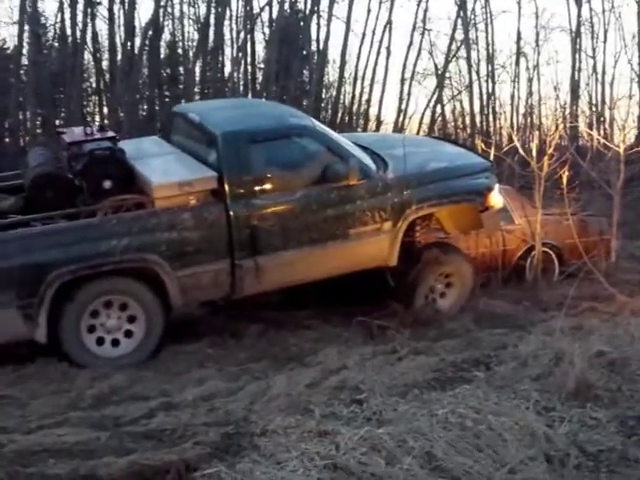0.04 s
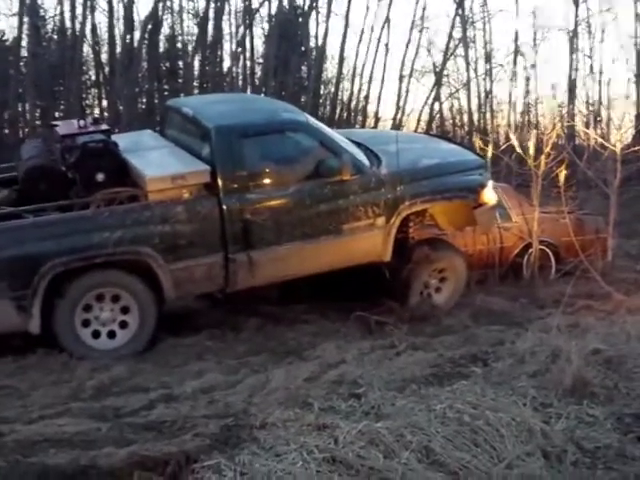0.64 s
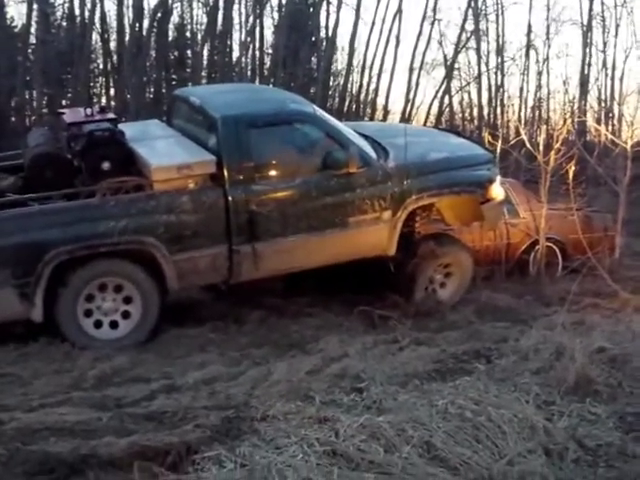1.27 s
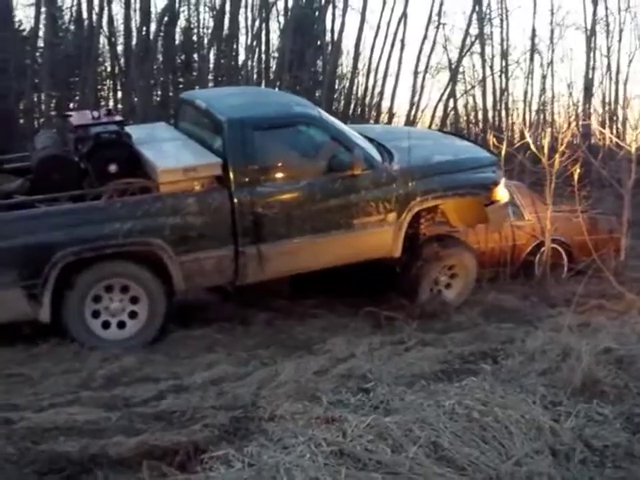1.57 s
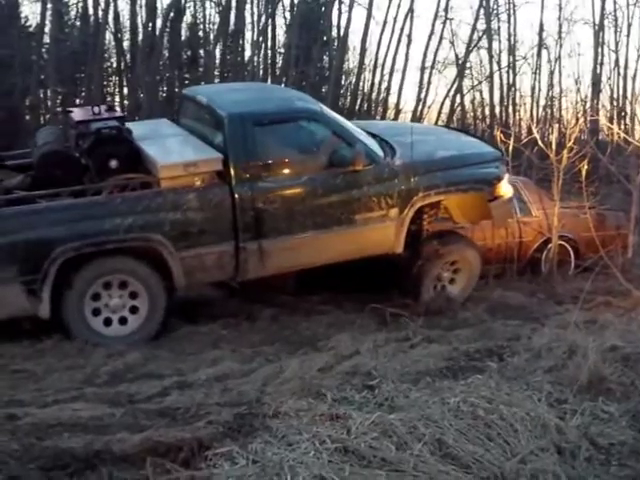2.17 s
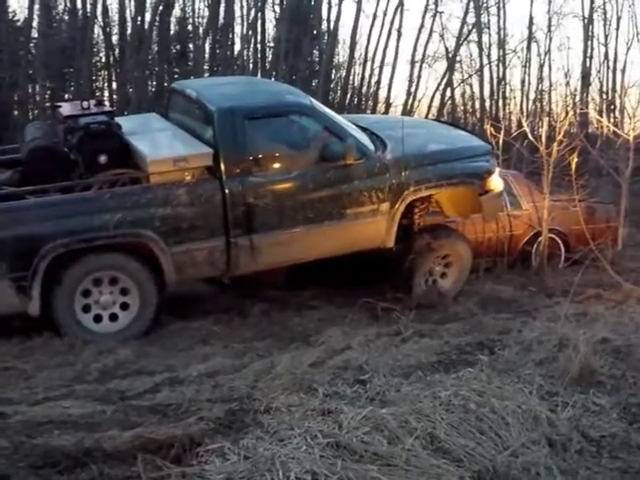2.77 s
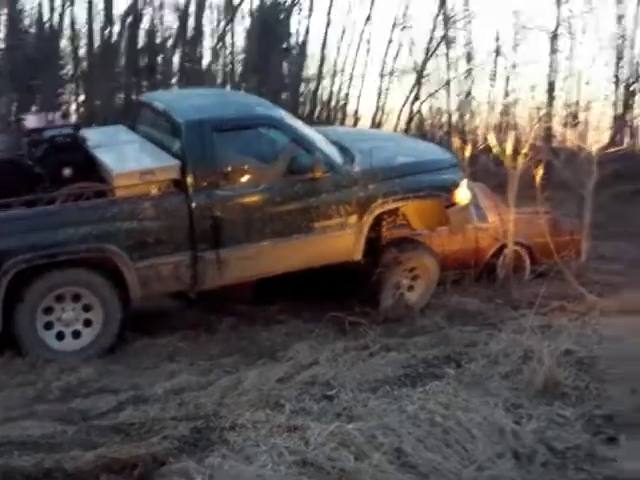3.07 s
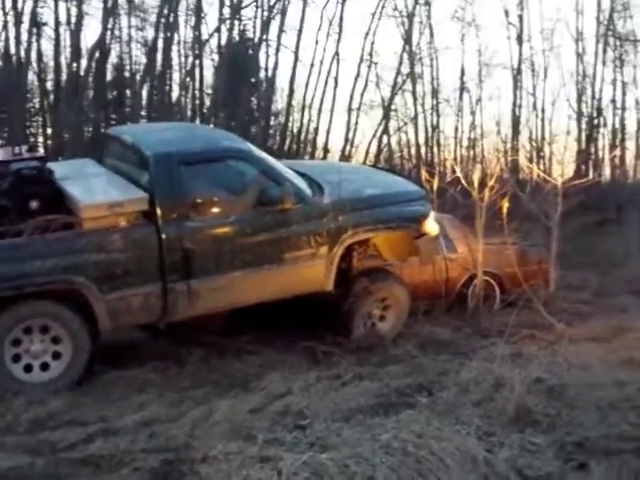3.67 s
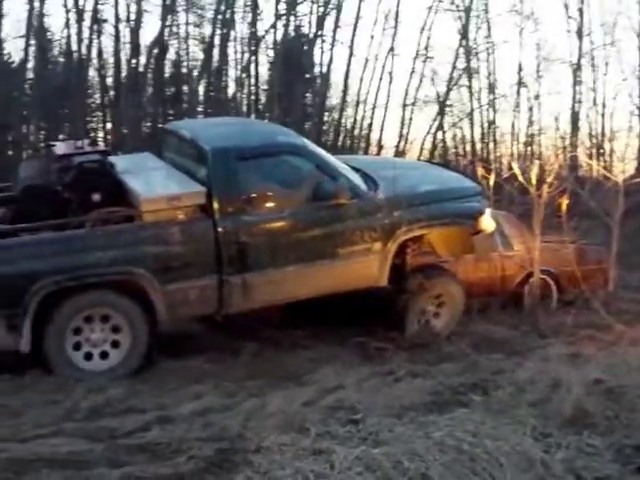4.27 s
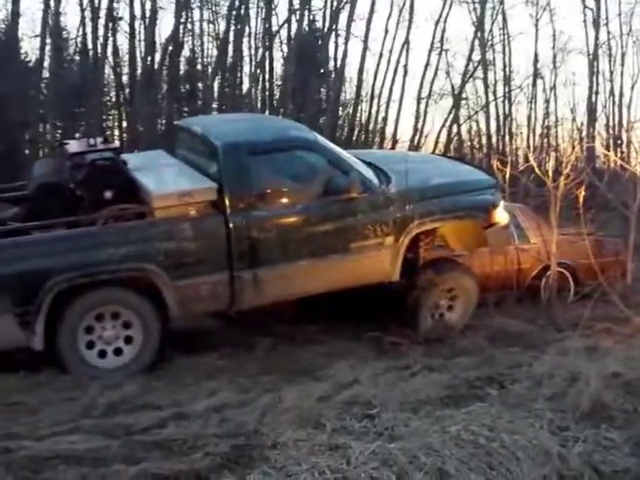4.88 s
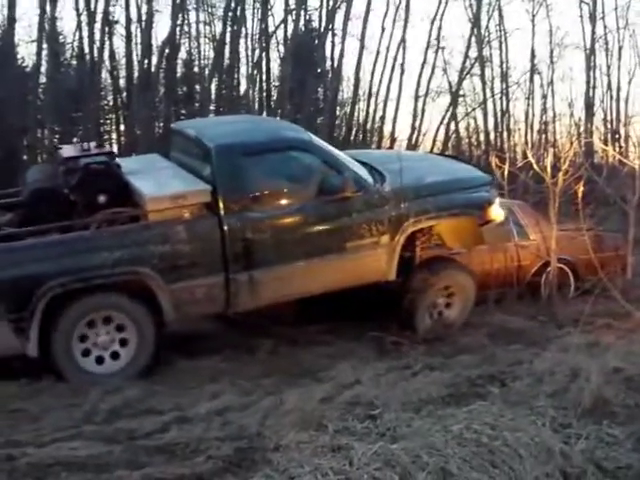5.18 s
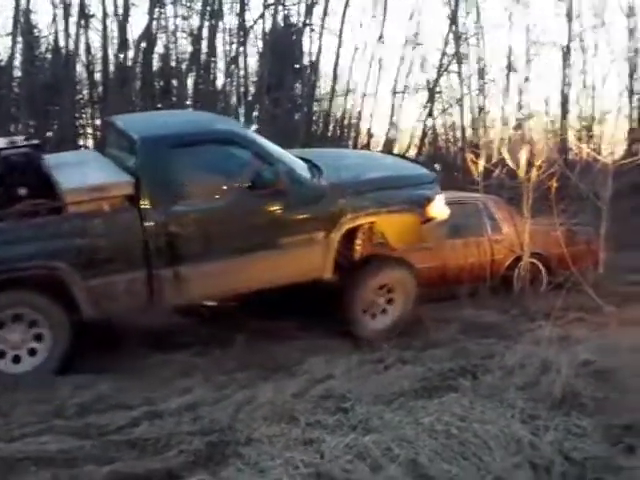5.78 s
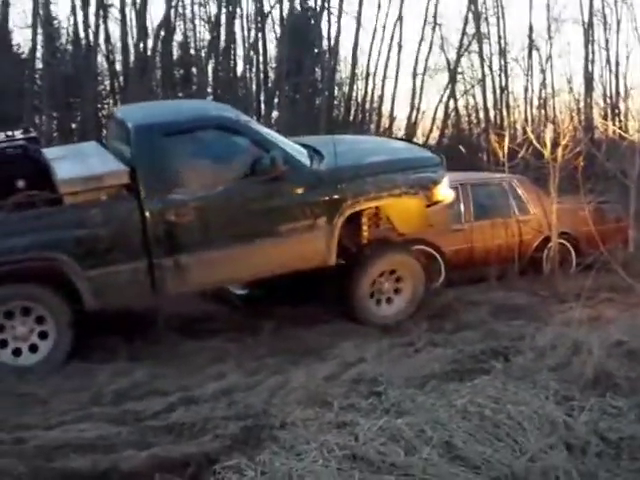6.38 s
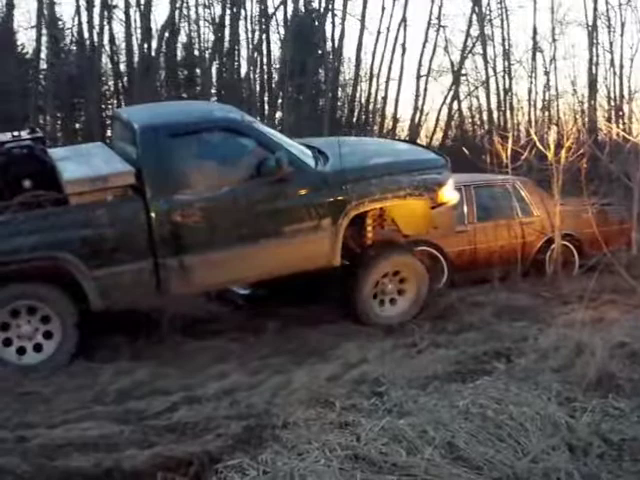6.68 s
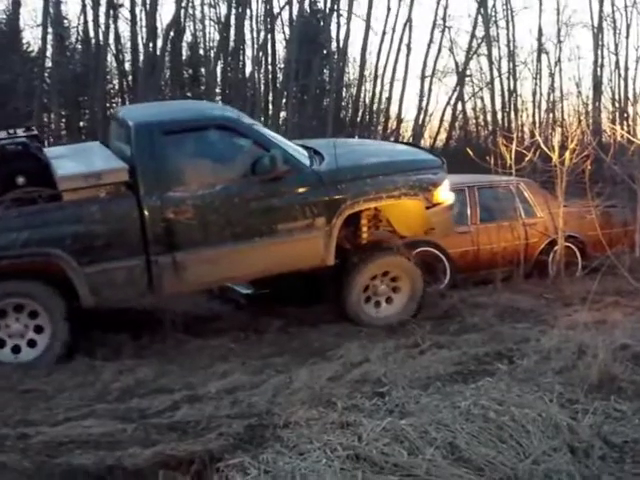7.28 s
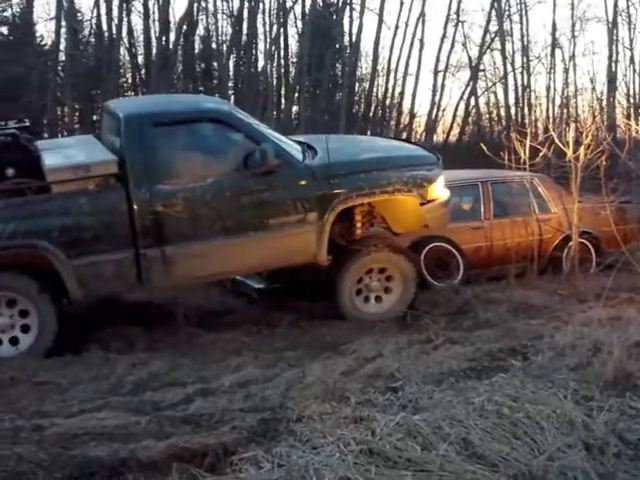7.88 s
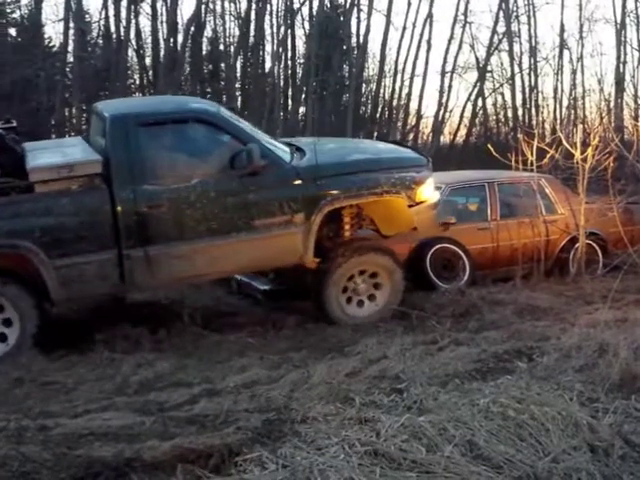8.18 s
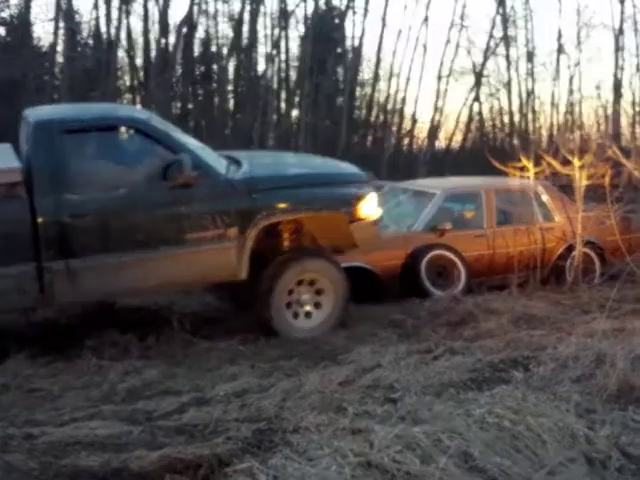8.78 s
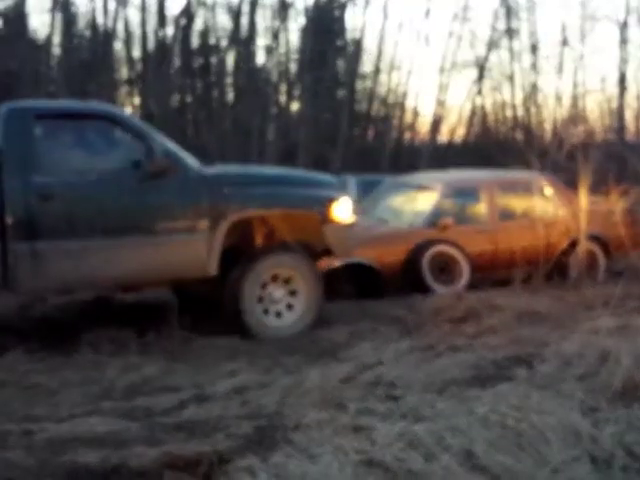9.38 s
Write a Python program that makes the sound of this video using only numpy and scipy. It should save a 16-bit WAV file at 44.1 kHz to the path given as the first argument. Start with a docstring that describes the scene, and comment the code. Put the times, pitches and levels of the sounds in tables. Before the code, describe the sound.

Heard from beside the vehicle outdoors, a heavy pickup engine rumbles and climbs through three revs, each bringing a raspy, clacking exhaust leak over rushing fan air and faint crackling grass. The engine eases as the truck rolls forward, with a short branch scrape, snapping twigs and two dull body knocks. It revs twice more in quick succession, then drops to a lumpy idle while the body knocks again and more twigs crack.

```python
"""A V8 pickup idles in a field and is revved five times, sinking back in between. From the start its fan
rushes, the exhaust booms in the tailpipe, and gas ticks hard under load, as from a leaking manifold (the
pipes on the engine). Dry grass crackles under the tyres. After the third rev, at 5.6 s, the truck rolls
forward over brush: a branch scrapes, twigs snap and the body knocks twice. Two more revs follow, and
as the engine falls back to idle the body knocks again and more twigs snap."""
import sys
import numpy as np
from scipy import signal
from scipy.fft import rfft, irfft, next_fast_len
from scipy.io import wavfile
from scipy.ndimage import uniform_filter1d

SR = 44100
rng = np.random.default_rng(int(sys.argv[2]) if len(sys.argv) > 2 else 0)


def wav_out(sig):
    """Save sig, one row per channel (or a flat mono array), as 16-bit PCM at SR to the path in sys.argv[1]."""
    wavfile.write(sys.argv[1], SR, np.round(np.clip(np.atleast_2d(sig).T, -1, 1) * 32767).astype(np.int16))


N = 420713
TIME = np.arange(N) / SR
UNEVEN_DB = 1.1  # basic spread in strength from one firing to the next

# engine speed: t/s, firings per second
ENGINE_SPEED = [(0.0, 50.87), (0.24, 49.65), (0.33, 63.74), (0.42, 75.26), (0.52, 92.58), (0.61, 103.67),
                (0.72, 105.84), (0.81, 105.87), (1.03, 96.4), (1.18, 99.09), (1.31, 98.66), (1.55, 76.57),
                (1.98, 50.16), (2.4, 48.9), (2.5, 56.28), (2.6, 67.61), (2.79, 82.59), (3.13, 83.24),
                (3.3, 105.91), (3.4, 121.02), (3.51, 136.96), (3.71, 128.75), (3.9, 114.62), (4.15, 94.68),
                (4.58, 60.14), (4.75, 52.01), (4.84, 47.46), (4.92, 60.92), (4.99, 72.49), (5.1, 85.2),
                (5.2, 97.79), (5.27, 111.62), (5.35, 123.11), (5.43, 128.5), (5.54, 111.55), (5.7, 89.96),
                (6.05, 69.36), (6.64, 53.28), (6.72, 65.97), (6.82, 62.88), (6.89, 68.83), (6.97, 88.73),
                (7.07, 97.21), (7.15, 94.17), (7.28, 88.51), (7.4, 82.12), (7.52, 77.33), (7.8, 94.9),
                (7.92, 99.87), (8.05, 96.81), (8.25, 91.96), (8.38, 81.49), (8.54, 69.3), (8.75, 65.86),
                (9.2, 57.6), (9.54, 51.3)]
# the eight cylinders in firing order: exhaust level/dB, delay along the pipe/ms, leak level/dB
CYLINDERS = [(8.5, 0.056, 14), (1.5, 2.36, 11), (4.5, 2.36, 15), (7, 0.4, 10), (-4, 1.76, 15),
             (6.5, 0.13, 17), (5, 0.82, 14.5), (0.5, 2.37, 11.5)]
# rise and fall of the highest sounds: t/s, level/dB
TREBLE_LEVEL = [(0.04, -65), (0.43, -58.5), (1.3, -81), (2.58, -58), (2.92, -67.5), (3.42, -54), (3.6, -81),
                (4.34, -79.5), (5.05, -60), (5.28, -54.5), (5.41, -57), (5.55, -71.5), (6.46, -83),
                (6.86, -50), (7.2, -59.5), (8.29, -54.5), (8.4, -83), (9.45, -60)]


def from_db(db):
    """Turn decibels into a gain."""
    return 10 ** (np.asarray(db) / 20)


def in_time(rows):
    """Read each column of a time table at every sample."""
    times, *columns = np.transpose(rows)
    return [np.interp(TIME, times, column) for column in columns]


def at_hz(points):
    """Read a frequency table in fine, even steps."""
    hz, value = np.transpose(points)
    size = next_fast_len(N // 2 + SR // 4)
    return np.interp(np.log(np.linspace(0, SR / 2, size + 1) + 1), np.log(hz), value)


def filtered(x, gains):
    """Give each frequency its own gain."""
    return irfft(rfft(x, 2 * len(gains) - 2) * gains)[..., :N]


def coloured(x, colour):
    """Shape the tone with a table so that nothing sounds early (a minimum-phase filter)."""
    db = at_hz(colour)
    cepstrum = irfft(np.log(from_db(db)))
    cepstrum[1:len(db) - 1] *= 2
    cepstrum[len(db):] = 0
    return filtered(x, np.exp(rfft(cepstrum)))


def passed(x, hz, kind):
    """Let only the lows, the highs or a band through."""
    return signal.sosfilt(signal.butter(4, hz, kind, fs=SR, output="sos"), x)


def resonance(x, hz, width_hz):
    """Ring at one pitch; the narrower the width, the longer the ring."""
    r = np.exp(-np.pi * width_hz / SR)
    feedback = [1, -2 * r * np.cos(2 * np.pi * hz / SR), r * r]
    return signal.lfilter(np.array([1, 0, -1]) * (1 - r * r) / 2, feedback, x)


def evened(x, low_hz, high_hz, size=5000):
    """Scale a stereo sound so that one band stays at level 1, averaged over `size` samples."""
    power = passed(x.mean(0), [low_hz, high_hz], "band") ** 2
    return x / np.sqrt(uniform_filter1d(uniform_filter1d(power, size), size // 2) + 1e-14)


def clicks(times, heights):
    """Place a one-sample click at each time."""
    return np.bincount(np.clip(np.asarray(times) * SR, 0, N - 1).astype(int), heights, N) + 1e-18


def dying(x, decay_s):
    """Give each click a fading tail."""
    return signal.lfilter([1], [1, -np.exp(-1 / (decay_s * SR))], x)


def wavering(per_s, spread_db):
    """A gain that wanders at random."""
    times = np.arange(0, N / SR + 1, 1 / per_s)
    return from_db(spread_db * np.interp(TIME, times, rng.standard_normal(len(times))))


def panned(pair):
    """The left side is louder in the low treble and almost silent at the very top."""
    # balance of the sides: f/Hz, left minus right/dB
    balance = [(60, 1.5), (250, 2), (700, 2.5), (1250, 7), (2300, 15), (3300, 4.5), (5000, 7), (7200, -2.5),
               (8300, -27), (14000, -36)]
    tilt_db = at_hz(balance)
    common_db = -10 * np.log10((from_db(tilt_db) + from_db(-tilt_db)) / 2)
    return np.array([filtered(pair[0], from_db(common_db + tilt_db / 2)),
                     filtered(pair[1], from_db(common_db - tilt_db / 2))])


def from_truck(x, lag_ms):
    """Direct sound reaches the left side a little late."""
    return np.array([np.interp(TIME - lag_ms / 1000, TIME, x), x])


def stereo_noise():
    """Noise whose two sides are most alike in the low notes."""
    # how alike the sides are: f/Hz, likeness (1 the same, -1 or less opposite)
    likeness = [(100, 0.67), (300, 0.54), (630, 0.81), (1000, 0.088), (1400, -0.35), (3000, -0.21),
                (6500, 0.36), (14000, -2)]
    alike = np.clip(at_hz(likeness), -.99, .999)
    mid, side = rng.standard_normal((2, N))
    return (filtered(mid, np.sqrt(1 + alike)) + filtered(side, np.sqrt(1 - alike)) * [[1], [-1]]) / 2**.5


def engine_load(rise_s=0.22, fall_s=0.35):
    """How hard the engine works, 0-1: it builds as the pedal is pressed and drains as the foot lifts."""
    # presses of the accelerator: pressed t/s, lifted t/s, depth 0-1
    presses = [(-0.16, 0.074, 0.26), (0.123, 0.57, 0.53), (0.867, 1.012, 0.34), (2.14, 2.623, 0.48),
               (3.02, 3.418, 0.62), (4.643, 5.401, 0.76), (6.604, 7.184, 0.72), (7.04, 7.6, 0.5),
               (7.415, 8.217, 0.83), (9.09, 9.6, 0.01)]
    return np.max([depth * np.clip(np.minimum((TIME - down) / rise_s, 1 - (TIME - up) / fall_s), 0, 1)
                   for down, up, depth in presses], axis=0)


def engine_db(base_db, load_db, doubling_db):
    """A level that follows the load, each doubling of engine speed and a slow swell."""
    # slow swell: t/s, level/dB
    swell = [(0.0, -1), (1.36, -2.5), (1.83, -3.5), (3.02, -0.1), (3.62, -5.5), (4.28, -10.5), (4.69, -5.5),
             (5.56, -4.5), (5.65, -12), (6.37, -16), (6.82, -6), (8.49, -12), (8.88, -17), (9.54, 0)]
    doublings = np.log2(in_time(ENGINE_SPEED)[0] / 90)
    return base_db + load_db * engine_load() + doubling_db * doublings + in_time(swell)[0]


def rolled(start_s=5.6, length_s=0.17):
    """How far the truck has rolled, 0-1, until its front wheel is beside the listener."""
    return np.clip((TIME - start_s) / length_s, 0, 1)


def firing_count(start=7.42):
    """A running count of firings as the engine turns."""
    return start + np.cumsum(in_time(ENGINE_SPEED)[0]) / SR


def firings():
    """The time of every firing and the table row of its cylinder."""
    count = firing_count()
    numbers = np.arange(np.ceil(count[0]), count[-1]).astype(int)
    return np.interp(numbers, count, TIME), np.array(CYLINDERS)[numbers % len(CYLINDERS)]


def grass(stalks_per_s=400, spread_db=4.5, hiss=0.05, crack_s=0.011):
    """Dry stalks crackle under the tyres: many faint cracks and a few loud ones."""
    # tone of dry grass: f/Hz, level/dB
    colour = [(2500, -9), (5000, 12.5), (8000, 6.5), (12000, -2), (15000, -26)]
    breaks = rng.random(N) < stalks_per_s / SR
    cracks = breaks * from_db(spread_db * np.minimum(rng.exponential(1, N), 4))
    rustle = (hiss + dying(cracks + 1e-18, crack_s)) * rng.standard_normal((2, N))
    level_db = in_time(TREBLE_LEVEL)[0] + 8 - 12 * engine_load()
    return from_db(level_db) * evened(panned(coloured(rustle, colour)), 7450, 22000, size=14000)


def twigs(crack_s=0.0025, splinter_s=0.036):
    """A sharp crack rings the wood, then it splinters briefly."""
    # snapping twigs: t/s, relative level/dB
    snaps = [(5.824, -48), (5.877, -37), (5.937, -39), (6.224, -45), (8.43, -38.5), (8.514, -34.5),
             (8.622, -35.5), (8.811, -38), (8.968, -43), (9.113, -39), (9.197, -49), (9.257, -43),
             (9.368, -26), (9.498, -25)]
    # ringing notes of dry wood: f/Hz, width/Hz, level/dB
    wood = [(820, 66, 6), (1360, 90, 8), (2150, 140, 12), (5500, 330, 3)]
    # tone of a snap: f/Hz, level/dB
    colour = [(290, -37), (500, -21), (575, -4), (826, 14.5), (2040, 10), (2290, 9), (3380, 3.5), (6320, 2),
              (14000, -21)]
    times, snap_db = np.transpose(snaps)
    breaks = clicks(times, from_db(snap_db + 3))
    burst = (dying(breaks, crack_s) + 0.8 * dying(breaks, splinter_s)) * rng.laplace(0, 1, N)
    ring = sum(from_db(db) * resonance(burst, hz, width) for hz, width, db in wood)
    colour_gain = np.sqrt(np.mean(from_db(at_hz(colour)) ** 2))
    return panned(from_truck(coloured(burst + ring, colour), lag_ms=0.292)) / colour_gain / 2


def branch_scrape(start_s=5.8, end_s=5.97, from_hz=450, to_hz=927, slips_per_s=260):
    """A branch slips along the underside and rings; its pitch rises as it bends."""
    along = np.clip((TIME - start_s) / (end_s - start_s), 0, 1)
    slips = (rng.random(N) < slips_per_s / SR) * rng.standard_normal(N)
    ring = dying(slips + 1e-18, decay_s=0.0022)
    phase = 2 * np.pi * np.cumsum(from_hz + (to_hz - from_hz) * along) / SR
    sound = ring / ring.std() * (np.sin(phase) + from_db(-3) * np.sin(3 * phase))
    return panned(from_truck(from_db(-34) * np.sin(np.pi * along) * sound, lag_ms=0.092))


def body_knocks(level_db=-5):
    """Bumps set the truck's body ringing briefly."""
    # bumps: t/s, relative level/dB
    bumps = [(5.949, -30), (6.221, -21), (8.518, -24)]
    # ringing notes of the body: f/Hz, level/dB, time to fade by 60 dB/s
    notes = [(166, 3, 0.11), (300, 6.5, 0.052), (600, -6, 0.092), (697, -8, 0.17), (810, -9.5, 0.18),
             (1200, -17, 0.037), (1750, -3, 0.044)]
    times, bump_db = np.transpose(bumps)
    sound = 0
    for hz, note_db, fade_s in notes:
        decay, step = from_db(-60 / (fade_s * SR)), 2 * np.pi * hz / SR
        blows = clicks(times, from_db(bump_db + note_db + level_db + rng.standard_normal(len(times))))
        sound += signal.lfilter([0, np.sin(step)], [1, -2 * decay * np.cos(step), decay ** 2], blows)
    return panned(from_truck(sound, lag_ms=0.04))


def fan():
    """Air rushes through the radiator, and the belt drive adds a thin whine."""
    # tone of the rushing air: f/Hz, level/dB
    colour = [(240, -5.5), (400, 2), (425, -29.5), (509, 2.5), (541, -7), (593, -0.5), (865, -4.5),
              (1050, -5), (1190, -3), (1490, -5), (2050, -1.5), (2570, -10), (3170, -15.5), (13800, -47.5),
              (14800, -71)]
    # notes of the belt drive: f/Hz, width/Hz, relative level/dB
    belt_notes = [(1215.5, 39, -8.5), (2628, 43, -13.5), (4720, 21, -26)]
    belt = stereo_noise() * wavering(per_s=18, spread_db=5.5) * from_db(-8 * rolled())
    whine = sum(from_db(db + 13) * resonance(belt, hz, width) for hz, width, db in belt_notes)
    rush = coloured(stereo_noise(), colour)
    level_db = engine_db(-34, load_db=-0.92, doubling_db=-3) - rolled()
    return from_db(level_db) * evened(panned(rush + whine), 406, 980, size=12000)


def spit_strengths(cylinders):
    """Each cylinder leaks its own amount, a little different every time."""
    return from_db(cylinders[:, 2] + UNEVEN_DB * rng.standard_normal(len(cylinders)))


def leak_sizzle(times, cylinders, crack_s=0.0028):
    """Under load the sharp edge of each spit of gas reaches high into the treble."""
    # tone of the sizzle: f/Hz, level/dB
    colour = [(2500, -13), (4200, 10), (5500, 19), (8000, 13.5), (12000, -8), (15000, -18)]
    edges = dying(clicks(times, spit_strengths(cylinders)), crack_s) * rng.standard_normal((2, N))
    sound = evened(panned(coloured(edges, colour)), 7600, 22000, size=14000)
    return from_db(in_time(TREBLE_LEVEL)[0] + 5) * np.sqrt(engine_load()) * sound


def clacks(crack_s=0.0022, tail_s=0.015):
    """The hardest ticks under load: dry cracks, each ringing briefly at its own pitch."""
    # clacks: t/s, relative level/dB, ring f/Hz
    hits = [(0.086, -22, 2420), (0.268, -24, 2270), (0.393, -20, 2490), (0.527, -13, 2360),
            (0.659, -17.5, 2430), (2.4226, -13, 2380), (3.1657, -18, 2500), (3.25, -8.5, 2600),
            (3.328, -7.5, 2630), (4.804, -20, 2260), (4.921, -21, 2390), (4.9678, -10, 2530),
            (5.049, -15, 2390), (5.0592, -7, 2410), (5.1516, -30, 2570), (5.3722, -6.5, 2350),
            (5.4035, -8, 2220), (5.4385, -6.5, 4900), (5.4998, -10.5, 2460), (6.762, -12, 2250),
            (6.822, -9.5, 2330), (6.899, -8.5, 2050), (6.9388, -12, 2150), (7.0265, -13, 2260),
            (7.196, -28, 2120), (7.7628, -22, 2100), (7.849, -11.5, 2190), (7.9284, -7, 2250),
            (8.008, -9, 3740), (8.0915, -10, 2340), (8.2077, -23, 2010), (8.242, -33, 2050)]
    # tone of a clack: f/Hz, level/dB
    colour = [(700, -2), (1400, 6.5), (2300, 0), (3000, 6.5), (4300, 9.5), (6000, -3.5), (9000, -7.5),
              (14000, -59)]
    sound = 0
    for start, db, hz in hits:
        age = np.maximum(TIME - start, 0)
        fade = np.exp(-age / crack_s) + 0.25 * np.exp(-age / tail_s) + 1e-12
        burst = (TIME > start) * fade * rng.standard_normal(N)
        sound += from_db(db - 5.5) * (burst + from_db(10) * resonance(burst, hz, width_hz=220))
    return panned(from_truck(coloured(sound, colour), lag_ms=0.26))


def heat_shield(times, strengths, low_hz=1252, high_hz=5424, mean_lag_s=0.0022):
    """Just after each spit, the manifold and its metal shield ring with a random mix of notes."""
    sound = 0
    for hz in np.geomspace(low_hz, high_hz, 28):
        blows = strengths * from_db(22) * rng.laplace(0, 1, len(times))
        touches = times + rng.exponential(mean_lag_s, len(times))
        sound += resonance(clicks(touches, blows), hz, width_hz=0.02 * hz)
    return sound


def leak_tone(pair):
    """The leak's tone shifts lower once the truck has rolled forward."""
    # tone before rolling: f/Hz, level/dB
    colour_before = [(410, -34), (700, -30), (848, -13.5), (1110, -9), (1240, -2.5), (2000, -4.5),
                     (2390, 7), (2930, -7), (3410, -6.5), (4580, -9.5), (6060, -13.5), (7340, -22.5),
                     (10600, -59), (11900, -28), (14800, -46.5)]
    # tone after rolling: f/Hz, level/dB
    colour_after = [(350, -57), (600, -54), (650, -10), (947, -0.5), (1210, -4.5), (2150, 10.5), (2960, 0),
                    (3300, -8.5), (3770, -4.5), (4800, -13), (5420, -21), (6280, -12.5), (8910, -30),
                    (10500, -73), (14800, -86)]
    after = coloured(pair, colour_after)
    after += 0.86 * resonance(after, hz=927, width_hz=67)
    return (1 - rolled()) * coloured(pair, colour_before) + rolled() * after


def manifold_leak(times, cylinders, crack_s=0.0024, tail_s=0.012, tail_gain=0.3, echo_gain=0.26):
    """Gas spits from the manifold at each firing; without load the ticks sink into a hiss."""
    force = np.clip(0.45 + 1.15 * engine_load(), 0, 1)
    strengths = spit_strengths(cylinders)
    spits = clicks(times, strengths)
    hiss = force * tail_gain * dying(spits, tail_s) + (1.1 - force)
    jet = (force * dying(spits, crack_s) + hiss) * rng.standard_normal(N)
    # each cylinder's crack bounces round the engine bay the same way every time
    age, count = np.arange(SR // 20) / SR, len(CYLINDERS)
    fade = np.exp(-age / crack_s) + tail_gain * np.exp(-age / tail_s)
    for k in range(count):
        echoes = fade * rng.standard_normal(len(age))
        own_spits = clicks(times[k::count], strengths[k::count])
        jet += echo_gain * force * signal.fftconvolve(own_spits, echoes)[:N]
    jet += force * heat_shield(times, strengths)
    pair = panned(leak_tone(from_truck(jet, lag_ms=0.25) + hiss * stereo_noise()))
    # the lower rasp and the higher tick each have their own level
    rasp = filtered(pair, from_db(at_hz([(2600, 2.0), (3400, -82)])))
    rasp_db = engine_db(-32, load_db=22.08, doubling_db=-0.11)
    tick_db = engine_db(-40, load_db=27.6, doubling_db=0.45)
    sound = from_db(rasp_db) * evened(rasp, 2284, 2374)
    sound += from_db(tick_db) * evened(pair - rasp, 4110, 9600)
    return from_db(-14 + 4 * force) * sound


def growl():
    """Clean tones in step with the cylinders; their balance shifts when the foot lifts."""
    # tones: multiple of the engine cycle, pulling level/dB, coasting level/dB
    tones = [(3.0, -8, 3), (4.0, -6, 0), (5.0, 5.5, 10), (6.0, -10, 1), (7.0, 2.5, -8), (8.0, 12.5, 10),
             (9.0, 2.5, -6), (10.0, 7, 1.5), (11.0, 8.0, 4.5), (12.0, 2.5, -7), (13.0, 2.5, 3),
             (14.0, 7, -8), (15.0, -3, -1), (16.0, 3, -3), (17.0, -21, 1.5), (18.0, -3, -2),
             (19.0, 1.5, -19), (20.0, 0.5, -5), (21.0, 2.5, 3.5), (22.0, -9, 1), (23.0, -8.5, -6),
             (24.0, -1.5, -1.5), (25.0, -0.5, 3.5), (26.0, -1, 3.5), (27.0, -16, -1), (28.0, 1.5, -9),
             (29.0, -9, -18), (30.0, -5.5, -3), (31.0, -12, -6.5), (32.0, -4.5, -3.0)]
    count = len(CYLINDERS)
    angle = 2 * np.pi * firing_count() / count
    pull = np.clip(2.8 * engine_load(), 0, 1)
    phases = np.angle(np.fft.fft(from_db(np.array(CYLINDERS)[:, 0])))
    sound = 0
    for multiple, pulling_db, coasting_db in tones:
        k = round(multiple)
        gain = pull * from_db(pulling_db) + (1 - pull) * from_db(coasting_db)
        sound += gain * np.cos(k * angle + phases[k % count])
    return from_db(6) * sound * 2 * in_time(ENGINE_SPEED)[0] / (count * SR)


def gas_flow(times, cylinders, puff_s=0.01):
    """Each firing sends a pulse and a noisy puff; the two unequal rows of cylinders make it burble."""
    # the fuel burns unevenly at idle and evenly at speed
    lumpy = (88 / np.interp(times, *np.transpose(ENGINE_SPEED))) ** 1.9
    chance = rng.standard_normal((len(times), 2)) * lumpy[:, None]
    delay_ms = cylinders[:, 1] + 0.12 * chance[:, 0]
    pulses = clicks(times + delay_ms / 1000, from_db(cylinders[:, 0] + UNEVEN_DB * chance[:, 1]))
    puffs = 0.004 * np.interp(TIME, times, lumpy) * dying(pulses, puff_s) * rng.standard_normal(N)
    steady = np.interp(in_time(ENGINE_SPEED)[0], [50, 86], [0, .9])
    return steady * growl() + (1 - steady) * pulses + puffs


def tailpipe(flow, rise_per_doubling=0.032, idle_firings_per_s=60.6):
    """The pipe rings at its own notes, which rise a little as a faster engine makes the gas hotter."""
    # notes of the pipe at idle: f/Hz, width/Hz, level/dB
    notes = [(68.7, 6.4, 2), (85.7, 2.7, -13), (106.8, 10.8, -4.5), (133.3, 8.2, 1.5), (181, 14, -9),
             (192.6, 12.2, 0), (227.4, 11.6, -1.5), (265.95, 7.2, 8.5), (286.2, 9.6, 0), (328.5, 9, -0.5),
             (393.6, 9.3, 1), (447.5, 12, -10.5), (508, 9, -9.5), (588, 8.3, -2.5), (650, 8, -13),
             (720, 18, -11)]
    doublings = np.maximum(np.log2(in_time(ENGINE_SPEED)[0] / idle_firings_per_s), 0)
    clock = np.cumsum(1 + rise_per_doubling * doublings)  # a faster clock lifts every note
    steps = np.arange(int(clock[-1]) + 1)
    inlet = np.interp(steps, clock, passed(flow, 3000, "low"))
    ringing = sum(from_db(db) * resonance(inlet, hz, width) for hz, width, db in notes)
    return np.interp(clock, steps, ringing)


def exhaust(times, cylinders):
    """Pulses of gas thump, boom and bark through the tailpipe, over a low rumble."""
    # tone of the muffled gas: f/Hz, level/dB
    colour = [(20, -31), (42, -30), (62, 16.5), (130, 19), (280, 25), (450, -53), (700, -74), (1200, -25),
              (3000, -41)]
    # three bands, low to high: t/s, thump level/dB, boom level/dB, bark level/dB
    levels = [(0.0, -5, -23, -25.5), (0.08, -24, -20, -23.5), (0.29, -13, -15.5, -26.5),
              (0.34, -27, -15, -21.5), (0.5, -32, -18, -21), (0.64, -18.5, -13, -22.5),
              (1.09, -23, -18.5, -20), (1.22, -21, -14, -24), (1.38, -29, -14.5, -21),
              (1.43, -31, -21, -22), (1.51, -32, -20, -17.5), (1.8, -27.5, -22, -31.5),
              (1.97, -23.5, -25.5, -30), (2.28, -25.5, -21.5, -26.5), (2.42, -15, -24, -33),
              (2.47, -24, -14.5, -24.5), (3.05, -33, -18.5, -19.5), (3.45, -24, -16.5, -24),
              (3.53, -42, -14.5, -20), (3.93, -28.5, -26.5, -31), (4.12, -39, -25, -28),
              (4.2, -36, -32, -30.5), (4.54, -33, -25.5, -36), (4.7, -22, -20, -27.5),
              (4.89, -21, -19.5, -30.5), (5.15, -39, -22.5, -26.5), (5.29, -25.5, -20, -23),
              (5.58, -26.5, -21, -29.5), (5.77, -58, -31.5, -33), (5.9, -37, -34.5, -38),
              (6.4, -42.5, -39, -43), (6.77, -24.5, -28.5, -29), (6.91, -26.5, -19, -37),
              (6.96, -24, -25.5, -23.5), (7.04, -35, -23.5, -26.5), (8.07, -34, -23, -30.5),
              (8.95, -42.5, -37.5, -43), (9.54, -28, -22, -27)]
    thump_db, boom_db, bark_db = in_time(levels)
    flow = gas_flow(times, cylinders)
    pipe = tailpipe(flow)
    low_notes = passed(passed(pipe, 52.3, "high"), 400, "low")
    muffled = passed(coloured(flow, colour), 1660, "low")
    pair = panned(from_truck(low_notes + from_db(-24) * muffled, lag_ms=0.05))
    thump = filtered(pair, from_db(at_hz([(78, 0), (100, -60)])))
    boom = filtered(pair - thump, from_db(at_hz([(150, 0), (190, -30)])))
    bark = filtered(pair, from_db(at_hz([(135, -30), (175, 0)])))
    # the pipe's upper notes blare at speed, less once the tailpipe has rolled away
    blare = panned(from_truck(passed(pipe, [450, 780], "band"), lag_ms=0.07))
    blare_db = engine_db(-34.5, load_db=-12, doubling_db=11) - 8 * rolled()
    rumble = coloured(stereo_noise(), colour) + from_db(4) * passed(stereo_noise(), [18, 45], "band")
    return (from_db(thump_db) * evened(thump, 40, 85, size=12000)
            + from_db(boom_db) * evened(boom, 85, 175, size=10000)
            + from_db(bark_db) * evened(bark, 175, 400, size=10000)
            + from_db(blare_db) * evened(blare, 375, 620, size=16000)
            + from_db(boom_db - 29) * evened(panned(rumble), 40, 550, size=40000))


def scene():
    """The engine and the ground under it."""
    times, cylinders = firings()
    engine = exhaust(times, cylinders) + manifold_leak(times, cylinders) + leak_sizzle(times, cylinders)
    return engine + clacks() + fan() + grass() + twigs() + branch_scrape() + body_knocks()


def record(dry, ceiling=0.97, cutoff_hz=14700):
    """Round off the tallest peaks and cut the very highest treble."""
    rounded = dry / (1 + (dry / ceiling) ** 8) ** (1 / 8)
    return signal.sosfilt(signal.ellip(10, .1, 80, cutoff_hz, fs=SR, output="sos"), rounded)


dry = scene()
out = record(dry)
wav_out(out)
```